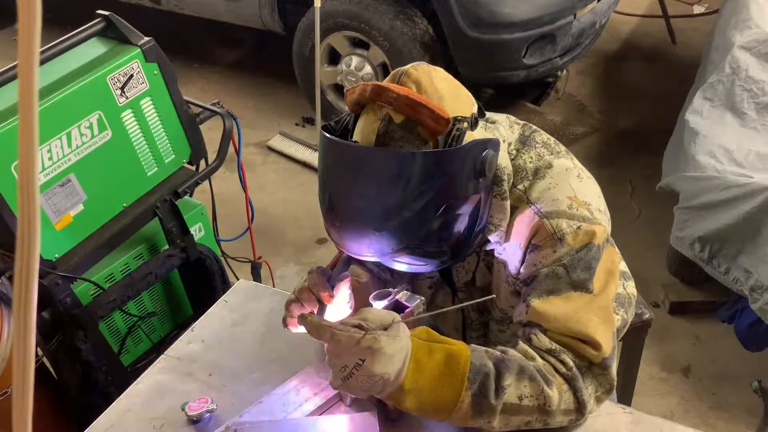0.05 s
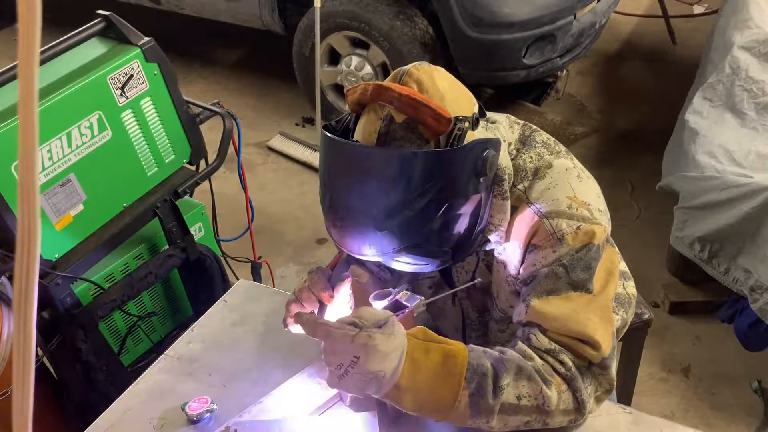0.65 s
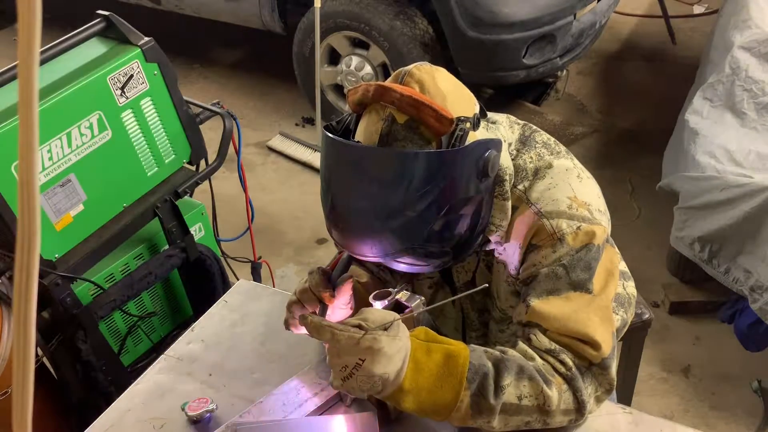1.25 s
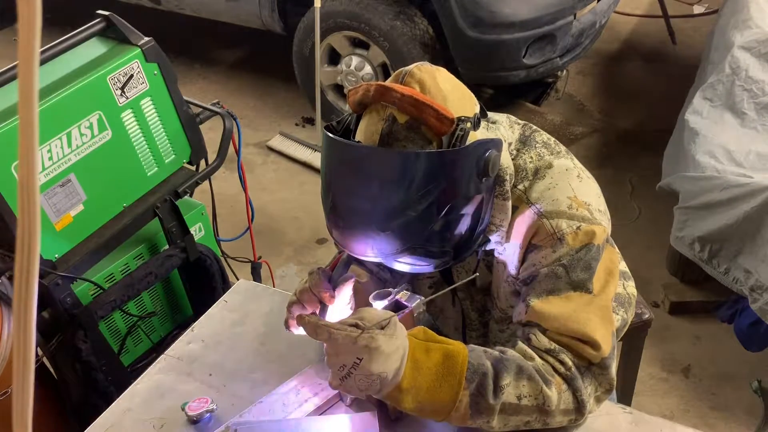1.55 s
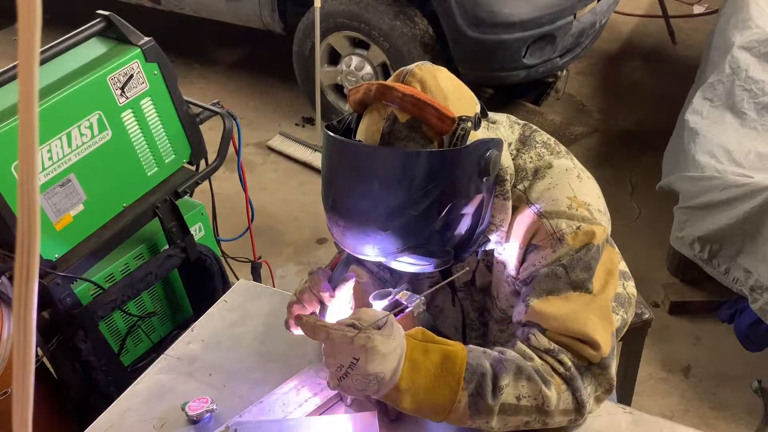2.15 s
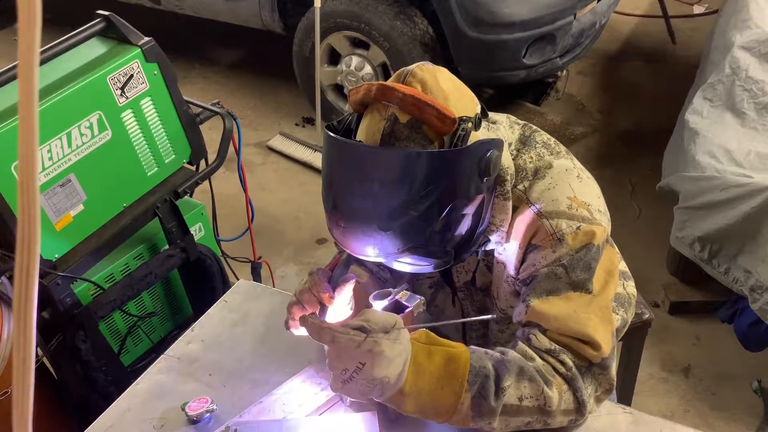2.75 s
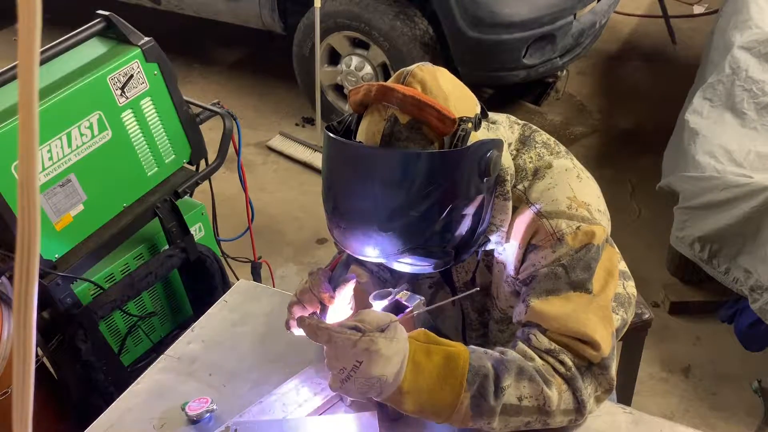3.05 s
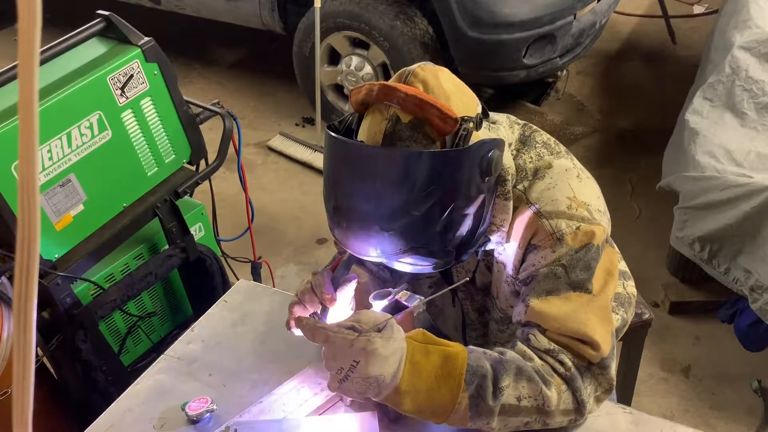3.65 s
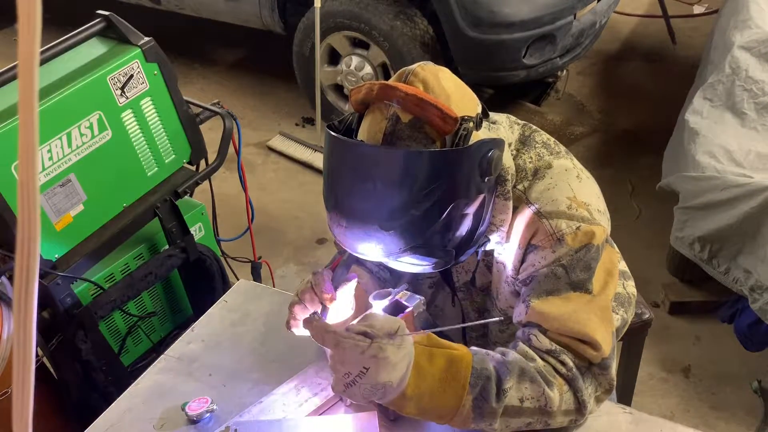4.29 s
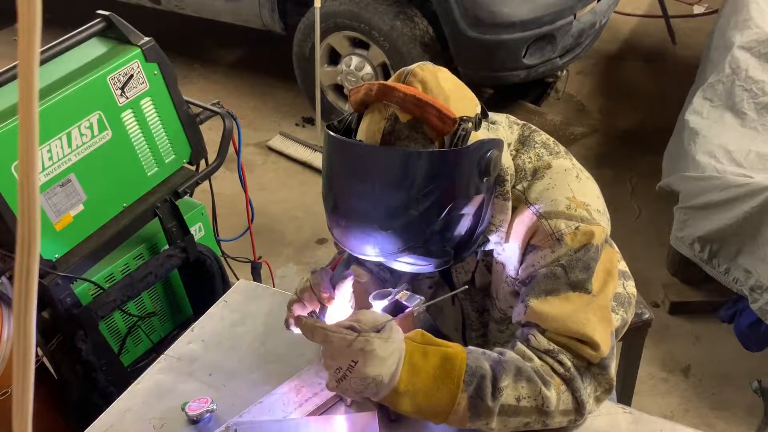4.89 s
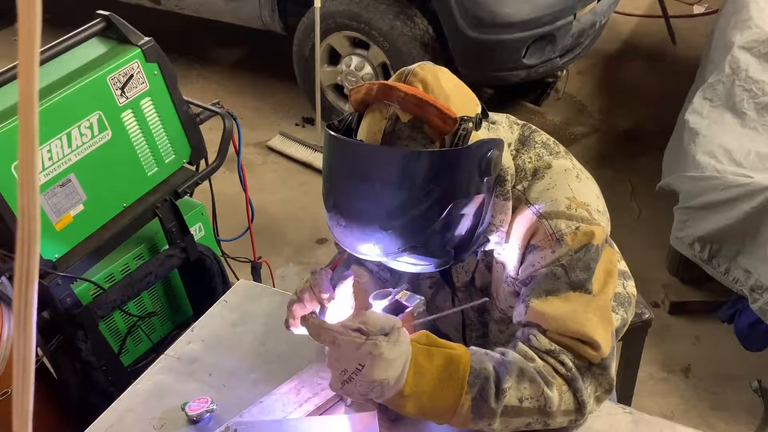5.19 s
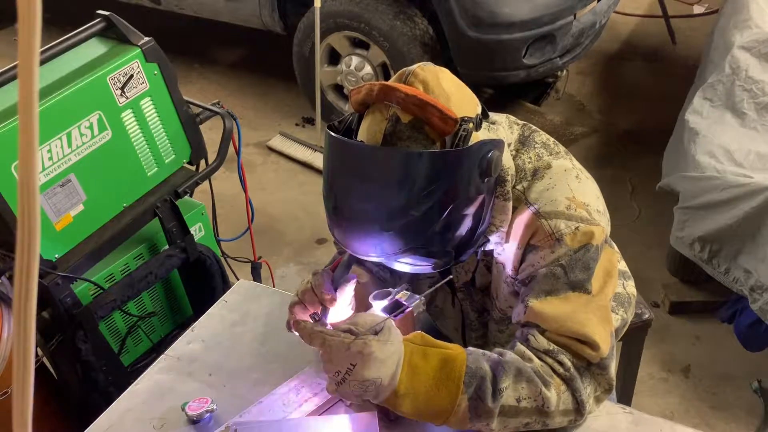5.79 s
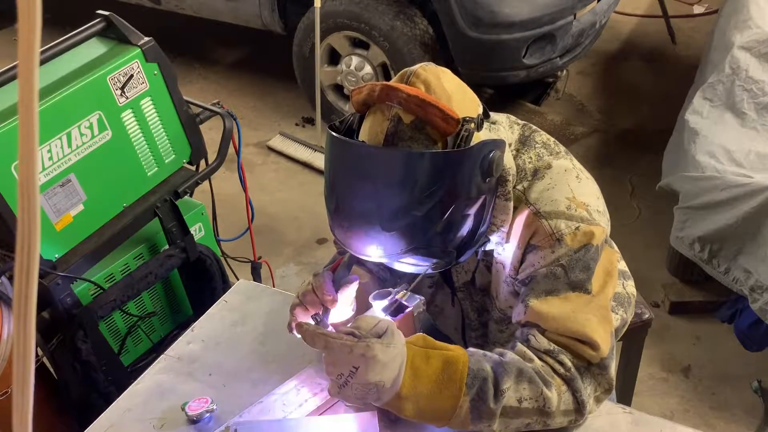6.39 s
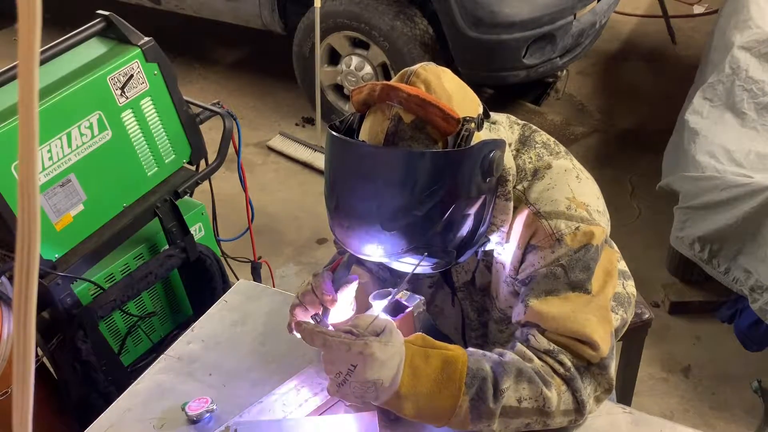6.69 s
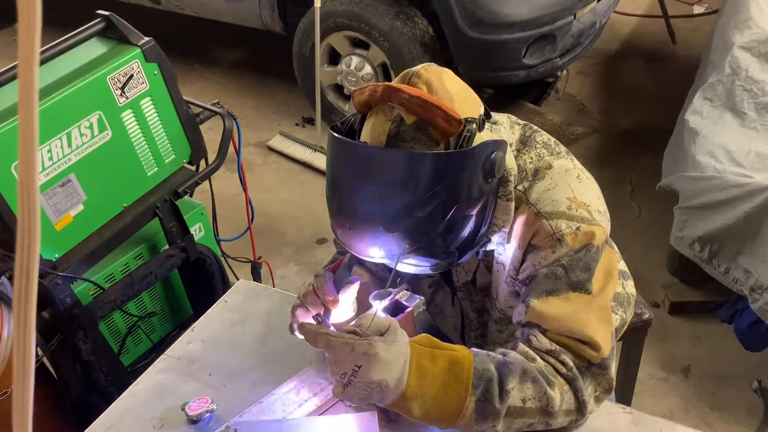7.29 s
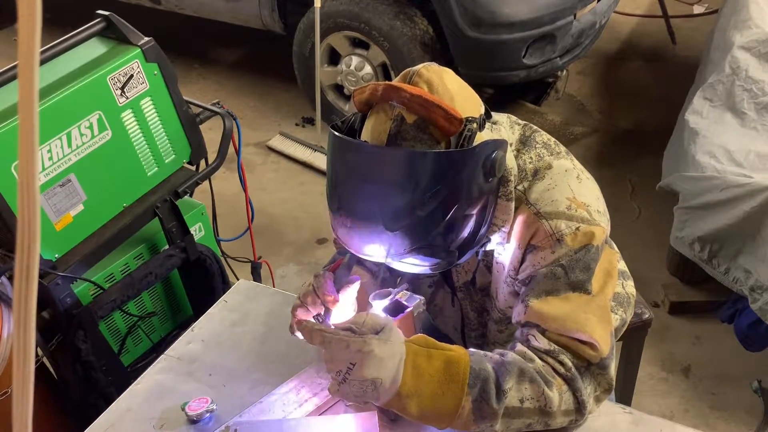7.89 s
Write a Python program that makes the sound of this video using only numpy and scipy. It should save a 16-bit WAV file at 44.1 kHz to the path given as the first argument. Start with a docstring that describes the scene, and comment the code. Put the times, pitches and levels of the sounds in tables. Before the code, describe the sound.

An electric welding arc buzzes on aluminum throughout, close by in a workshop with little echo. The buzz is bright and fizzy, holding one pitch while its loudness wavers. It opens with a brief rasp and a few sharp spits, dips, then swells at about 0.5 seconds. From 1 to 1.5 seconds it hardens into a harsh rasp, then returns to a softer buzz with occasional crackles. Strong, sputtering rasps come again from 3 to 3.5 and from 4.5 to 4.9 seconds. The buzz drops briefly just after 5 seconds, and shorter rasps follow around 5.4, 6.2 and 7.2 seconds. Between them the softer buzz keeps swelling and thinning, continuing to the end at about 8 seconds. Underneath, shielding gas hisses steadily from the torch, and the welding machine's cooling fan holds a mid-pitched whine with a light rush of air.

```python
"""An AC TIG arc buzzes on a small aluminium tank in a workshop. The current reverses twice a cycle, and
each reversal radiates a pressure pulse that excites the resonances of cup, tank and helmet. The soft
buzz swells as the welder lengthens the arc and dips when the filler rod chokes it; whenever the arc
goes out at a reversal and must restrike, it turns to a hard rasp. Behind it, shield gas hisses from
the cup and the welder's cooling fan whines at its blade-passing frequency."""
import sys
import numpy as np
from scipy import signal
from scipy.fft import rfft, irfft, next_fast_len
from scipy.io import wavfile

SR = 44100
rng = np.random.default_rng(int(sys.argv[2]) if len(sys.argv) > 2 else 0)


def pcm_store(signal):
    """Save signal as 16-bit PCM."""
    levels = np.round(np.clip(np.atleast_2d(signal), -1, 1) * 32767)
    wavfile.write(sys.argv[1], SR, levels.astype(np.int16).T)


N = 350154
T = np.arange(N) / SR
AC_HZ = 258.07
# where the current reverses, as shares of a cycle: first, second
REVERSAL_SHARES = [.505, .775]
# stretches of restriking, levels relative: start_s, end_s, snap_db, body_db, top_db
RESTRIKE_SPANS = [(0, .135, -38, -9, -1), (0.957, 1.04, -32, -4, 2), (1.04, 1.528, -35, -6.5, 1.5),
                  (3.039, 3.486, -33, 1.5, 4.5), (4.458, 4.882, -30.5, -2, 1), (5.31, 5.45, -40, 1.5, -5),
                  (6.081, 6.279, -35.5, 0, -2), (7.091, 7.204, -31.5, -5, -2),
                  (7.206, 7.336, -35.5, -.5, -3)]


def arc(length, choke_db, gain_db=21.0, body_hz=4500, top_hz=11300, sizzle_s=0.006, glove_db=-14):
    """Impulse excitation: snaps, their sizzle and their echo off the glove drive fixed resonances."""
    # modes of cup, tank and helmet gap: centre_hz, width_hz, first_db, second_db, restrike_db
    modes = [(822, 160, 3.5, 0, 3), (1325, 335, 1.5, 3.5, 4.5), (2193, 404, -5, -1, 4.5),
             (2628, 410, -3, 8, 5), (3050, 320, -7.5, -9.5, 3.5), (3670, 335, 2, 3.5, 2.5),
             (4436, 610, 0, 1.5, 3.5), (6430, 2200, 0.5, 7, 4.5), (7630, 460, -2.5, -4, 3),
             (8280, 620, 4.5, 3.5, 4), (9080, 660, -1, 9.5, 1), (10540, 1390, 2.5, 4, 4),
             (11620, 350, 1, 8, 3.5), (12160, 570, 5, 2, -5), (13500, 1400, 9, 16, 6),
             (15200, 470, 15.5, -1, 5.5)]
    # narrow antiresonances: centre_hz, width_hz, depth_db
    hollows = [(1850, 90, -4), (5000, 250, -8), (8000, 100, -5), (9800, 140, -4), (14850, 200, -4)]
    # broad colour of every snap: frequency_hz, gain_db
    bite = [(750, -1), (1400, 2.5), (2000, 0), (3200, -.5), (6200, -.5), (7300, 1.5), (10800, 3),
            (12500, 0)]
    # sizzle trailing each kind of snap, relative to it: first_db, second_db, restrike_db
    sizzles_db = [-36, -39, -54]
    energy_decay = np.exp(-1 / (sizzle_s * SR))
    echo_s = (0.396 + 0.031 * wander(1.5)) / 1000  # the glove moves
    centres, widths, *modes_db = np.transpose(modes)
    trains = (*reversals(length, choke_db), restrikes())
    polarities = (-1, 1, 1)  # the two reversals push the air in opposite senses
    out = 0
    for train, sign, mode_db, sizzle_db in zip(trains, polarities, modes_db, sizzles_db):
        times, db, body_db, top_db = train
        hz, path = scattering()
        body = 1 / (1 + (hz / body_hz) ** 6)
        top = 1 / (1 + (top_hz / (hz + 1)) ** 20)
        hollow_db = sum(depth * np.exp(-((hz - f) / width) ** 2) for f, width, depth in hollows)
        gain = resonances(hz, zip(centres, widths, mode_db)) * amp(hollow_db + log_interp(bite, hz))
        colour = path * minimum_phase(gain)
        hiss = amp(sizzle_db) * rng.standard_normal(N)
        for band, band_db in ((body, body_db), (1 - body - top, 0), (top, top_db)):
            sizes = sign * amp(db + band_db + gain_db)
            echoes = clicks(times + np.interp(times, T, echo_s), amp(glove_db) * sizes)
            snaps = clicks(times, sizes) + echoes
            sizzle = np.sqrt(signal.lfilter([1], [1, -energy_decay], snaps ** 2 + 1e-20)) * hiss
            response = np.roll(irfft(colour * band), 256, axis=1)
            out += signal.oaconvolve((snaps + sizzle)[None], response, axes=1)[:, 256:256 + N]
    return out


def reversals(length, choke_db, roam_hz=7, pop_share=0.12, pop_db=2.5, crackle_db=3.5):
    """Periodic pulses make a buzz: a fizz of blasted oxide, then a tick unless the arc restrikes."""
    # top treble of the soft snaps: time_s, gain_db
    treble = [(.3, 4), (.66, -0.5), (.73, -2), (.95, -0.5), (2.5, 1.5), (3.3, -4), (4.2, 1), (4.95, -4.5),
              (5.45, 0), (5.56, -8), (5.8, 0), (6.25, 0), (6.4, -11), (6.8, -6), (6.9, 1), (7.3, -1),
              (7.4, -3), (7.94, -5)]
    cycles = np.arange(int(N / SR * AC_HZ)) / AC_HZ
    first, second = (cycles + share / AC_HZ for share in REVERSAL_SHARES)
    length, choke_db = np.interp(cycles, T, length), np.interp(cycles, T, choke_db)
    hard = np.interp(second, T, restriking()) > 0.9
    roam, slip, sway, clump = (np.interp(cycles, T, wander(hz)) for hz in (roam_hz, roam_hz, 19, 19))
    _, jitter, crackle = rng.standard_normal((3, 2, len(cycles)))
    popping = rng.random(jitter.shape) < pop_share  # oxide pops at random
    pops = popping * np.minimum(rng.exponential(1, jitter.shape), 2) * np.clip(1 - length, 0, 1)
    # the arc root roams; the gap between the snaps slips with arc length, shifting the timbre
    slip_us = np.outer([1, 0], 25 * (slip + 1 - length))
    late_us = np.where(hard, 0.15, 1) * (9 * roam + slip_us + (2.5 + length) * jitter)
    times = np.array([first, second]) + late_us / 1e6
    first_db = np.where(hard, -40.5, by_length(-46.5, -34, length) + choke_db)
    second_db = by_length(-55, -42.5, length) + choke_db
    db = np.array([first_db, second_db]) + 1.12 * sway + pop_db * pops
    sputter_db = ~hard * crackle_db * np.tanh(crackle) * (1 - np.tanh(clump))
    body_db = np.array([by_length(2, 0, length), by_length(-4, 3.5, length)]) + sputter_db
    top_db = np.interp(times, *np.transpose(treble))
    firsts, seconds = np.stack([times, db, body_db, top_db], axis=1)
    return firsts, seconds[:, ~hard]


def restrikes(drift_us=4, jitter_us=1.3, falter_us=45, sway_db=0.7, rough_db=0.74):
    """Electrical breakdown: the arc reignites with one hard crack a cycle, or spits a lone one."""
    # faltering cracks, late and mostly weaker: time_s, change_db
    falters = [(3.054, -14), (3.058, -15), (3.066, 2), (3.109, -6), (3.12, -7), (3.163, -3), (3.19, -3),
               (3.202, -6), (3.237, -2), (3.283, -4), (3.318, -5), (3.376, -6), (3.454, -9), (3.469, -15),
               (3.481, -9), (4.529, -5), (4.638, -2), (4.684, 3.5), (4.727, -10), (5.32, 7), (5.343, -6),
               (5.363, -7), (5.41, -11), (5.437, -7), (6.096, 3), (6.262, -8)]
    # lone cracks, levels relative: time_s, snap_db, body_db
    spits = [(.181, -38, 1), (.1864, -37, 3), (.192, -36, -3), (.205, -43, -3), (0.248, -34.5, 3),
             (0.2524, -34, -3), (0.2666, -35, 1), (0.3403, -32, -3), (.349, -32.5, 0), (.678, -32, -15),
             (0.9368, -33, -2), (.949, -34, 5.5), (1.551, -42, 9), (1.591, -37, -2), (1.602, -37, -4),
             (2.0626, -33, -2), (2.095, -31, -7), (2.099, -34, -3), (2.8124, -32.5, 1), (2.823, -33, -3),
             (3.0147, -34, 0), (3.4885, -38, 1), (3.5, -44, 3), (4.888, -40, 6), (4.901, -42, 6),
             (5.475, -42, 10)]
    times = (np.arange(int(N / SR * AC_HZ)) + REVERSAL_SHARES[1]) / AC_HZ
    hard, levels = np.zeros(len(times), bool), np.zeros((len(times), 3))
    for start, end, *row in RESTRIKE_SPANS:
        inside = (times > start) & (times < end)
        hard[inside], levels[inside] = True, row
    drift, sway = (np.interp(times, T, wander(10)) for _ in range(2))
    rough, jitter, crackle_db = rng.standard_normal((3, len(times)))
    db, body_db, top_db = levels.T
    db = db + rough_db * rough + sway_db * sway
    late_us = drift_us * drift + jitter_us * jitter
    for time_s, change_db in falters:
        at = np.argmin(abs(times - time_s))
        db[at] += change_db
        late_us[at] += falter_us * (1 + abs(jitter[at]))
    cracks = np.array([times + late_us / 1e6, db, body_db + crackle_db, top_db])
    return np.hstack([cracks[:, hard], np.transpose([(*row, 0) for row in spits])])


def resonances(hz, modes, cutoff_hz=660):
    """Overlapping modes add in power; a source much smaller than the wavelength radiates little."""
    power = sum(amp(db) ** 2 / (1 + (2 * (hz - f) / width) ** 2) ** 2 for f, width, db in modes)
    return np.sqrt(power / (1 + (cutoff_hz / (hz + 1)) ** 12))


def scattering(scatter_ms=1.0, scatter_db=4, apart_db=-11, room_db=-12, size=16384):
    """Multipath: a snap arrives directly, scatters off tank and helmet, then reverberates."""
    # workshop reverberation: frequency_hz, t60_s
    decay = [(500, 0.071), (4000, 0.19), (15000, 0.11)]
    # level difference between channels: frequency_hz, left_minus_right_db
    balance = [(2000, 4.5), (5000, -3), (6500, 2), (9500, -5.5), (12000, 0)]
    # phase difference between channels: frequency_hz, left_lead_rad
    bearing = [(600, 0.45), (1200, 2.03), (2500, 1.26), (5000, 1.14), (8000, 1.9), (13000, 2.46)]
    ms, hz = 1000 * np.arange(size) / SR, np.fft.rfftfreq(size, 1 / SR)
    bursts = rng.standard_normal((3, size)) * np.exp(-np.square(ms / scatter_ms))
    bursts = rfft(bursts / np.linalg.norm(bursts, axis=1, keepdims=True))
    near = (1 + amp(scatter_db) * bursts[2]) * (1 + amp(apart_db) * bursts[:2])
    near /= np.sqrt(abs(near) ** 2 + 0.18)  # smears the snap but keeps its colour
    f, t, noise = signal.stft(rng.standard_normal((2, size)), SR, nperseg=256)
    fading = noise * amp(-60 * t / log_interp(decay, f)[:, None])
    tail = signal.istft(fading, SR, nperseg=256)[1][:, :size]
    tail = rfft(tail / np.linalg.norm(tail, axis=1, keepdims=True))
    lead = np.outer([0.5, -0.5], log_interp(bearing, hz))
    return hz, (near + amp(room_db) * tail) * pan(log_interp(balance, hz)) * np.exp(1j * lead)


def torch(draw_s=0.1, close_s=0.057, tremor=0.23, dip_edge_s=0.0058):
    """Amplitude modulation by hand: the unsteady arc length, and the choking by the rod in dB."""
    # the torch is drawn back, 0 for a short arc and 1 for a long one: start_s, end_s, length
    draws = [(.17, .33, 0.1), (.5, .635, 1), (.97, 1.01, 0.62), (1.47, 1.51, 0.56), (1.56, 1.72, 0),
             (2.03, 2.13, 0.3), (2.23, 2.51, 0.75), (2.55, 2.61, 0.43), (2.78, 2.85, 0.25),
             (3.07, 3.46, 0.97), (3.92, 4.02, 0.59), (4.18, 4.26, 0.46), (4.28, 4.41, 0.73),
             (4.49, 4.66, 1), (4.7, 4.85, 0.83), (5.09, 5.27, 0.71), (5.36, 5.44, 0.55), (5.72, 5.8, 0.23),
             (5.97, 6.03, 0.82), (6.12, 6.25, 0.66), (6.59, 6.62, 0.1), (6.88, 7.05, 0.7),
             (7.12, 7.14, 0.6), (7.29, 7.31, 0.97), (7.53, 7.58, 0.52), (7.65, 7.735, 0.88)]
    # the filler rod enters the pool: start_s, end_s, change_db
    dips = [(0.353, 0.385, -6), (3.514, 3.68, -0.5), (4.928, 5.067, -2.5), (5.13, 5.178, -12),
            (5.453, 5.63, -3), (6.29, 6.54, -1.5), (7.337, 7.364, -2.5), (7.735, 7.767, -3.5)]
    length = held(draws, draw_s, close_s) + tremor * np.tanh(wander(52))
    choke_db = -held([(start, end, -db) for start, end, db in dips], dip_edge_s, dip_edge_s)
    return length, choke_db


def restriking(edge_s=0.007):
    """A gate: 1 while the arc restrikes, 0 while it burns softly."""
    return held([(start, end, 1) for start, end, *_ in RESTRIKE_SPANS], edge_s, edge_s)


def hum(length, choke_db, restrike_db=-4):
    """Thermal expansion: the arc column heats twice a cycle; unequal halves add the fundamental."""
    fundamental_db = by_length(-63, -50.5, length) + choke_db + restrike_db * restriking()
    octave_db = by_length(-56, -41.5, length) + choke_db
    phase = 2 * np.pi * AC_HZ * T + 0.015 * wander(24)
    octave = amp(octave_db) * stereo_sine(2 * phase, lead_rad=0.56) * pan(side_db=2)
    return np.sqrt(2) * (octave + amp(fundamental_db) * np.sin(phase))


def whine(length, choke_db, long_arc_db=-6, restrike_db=-8, waver_db=3.0):
    """Upper harmonics of the current sing out while the arc is short, each wavering on its own."""
    # partials of the short arc: harmonic, level_db
    partials = [(8, -66.5), (9, -66), (12, -56.5), (15, -62.5), (16, -61.5), (18, -60), (22, -59.5),
                (23, -58.5), (24, -57.5), (27, -65), (28, -62.5), (32, -61.5), (35, -78), (54, -68),
                (59, -61)]
    phase, rasp = 2 * np.pi * (AC_HZ * T - REVERSAL_SHARES[0]), restriking()
    arc_db = choke_db + rasp * restrike_db + (1 - rasp) * long_arc_db * length
    tones = sum(amp(db + waver_db * wander(5)) * stereo_sine(round(k) * phase, lead_rad=1)
                for k, db in partials)
    return np.sqrt(2) * amp(arc_db) * tones


def growl(length, short_arc_db=-9):
    """Low harmonics of the current fill out the rasp, most when a long arc restrikes."""
    # partials of a long restriking arc: harmonic, level_db
    partials = [(3, -56.5), (4, -59), (5, -55), (6, -55)]
    phase = 2 * np.pi * (AC_HZ * T - REVERSAL_SHARES[1])
    tones = sum(amp(db) * np.sin(round(k) * phase + 2 * np.pi * rng.random()) for k, db in partials)
    return np.sqrt(2) * restriking() * amp(short_arc_db * (1 - length)) * tones


def gas(level_db=-50.5, restrike_db=-3):
    """Jet noise: argon hisses from the torch cup, a little weaker while the arc restrikes."""
    # relative spectrum of the jet: frequency_hz, density_db
    jet = [(600, -24), (1500, -2.5), (3000, 10), (5100, 5), (6200, 9.5), (9000, 3), (12000, 0), (15500, -7)]
    flicker_db = 0.5 * wander(20)
    return flow_noise(jet) * amp(level_db + flicker_db + restrike_db * restriking())


def fan(blade_hz=578.3, blade_db=-40, flutter=0.17, rush_db=-46.5, mains_hz=120, mains_db=-78):
    """Blade passage gives harmonics that flutter in the draught, over rushing air and mains hum."""
    # partials of the blade tone: harmonic, relative_db, left_lead_rad
    partials = [(1, -0.54, 0.81), (2, -21, 0.83), (3, -30.5, 1.7), (6, -16, 2.42)]
    # relative spectrum of air rushing through the welder's case: frequency_hz, density_db
    draught = [(25, -73), (62, -45), (105, -19.5), (165, -23), (215, -15.5), (310, -8), (400, -1.5),
               (490, 1), (620, -7.5), (740, -13), (1000, -12.5), (2600, -13), (5000, -20.5), (15000, -27)]
    hz = blade_hz + 0.797 * wander(1.5)
    db = blade_db + 0.52 * wander(7.4)
    phase = 2 * np.pi * np.cumsum(hz) / SR + 0.029 * wander(23)
    blades = sum(amp(db + gain_db) * (1 + flutter * wander(23.6)) * stereo_sine(round(k) * phase, lead)
                 for k, gain_db, lead in partials)
    mains = amp(mains_db) * np.sin(2 * np.pi * mains_hz * T)
    rush = flow_noise(draught) * amp(rush_db + 1.54 * wander(33))
    return np.sqrt(2) * (blades * pan(side_db=2.5) + mains) + rush


def flow_noise(spectrum):
    """Partial coherence: two channels of coloured noise, alike at long wavelengths."""
    # likeness of the channels: frequency_hz, correlation
    likeness = [(130, 0.93), (290, 0.9), (640, 0.63), (1400, 0.053), (7000, -0.48), (15000, -0.19)]
    hz = np.fft.rfftfreq(N, 1 / SR)
    left, other = rfft(rng.standard_normal((2, N)))
    correlation = log_interp(likeness, hz)
    right = correlation * left + np.sqrt(1 - correlation ** 2) * other
    return unit(irfft(np.array([left, right]) * amp(log_interp(spectrum, hz)), N))


def minimum_phase(gain):
    """Causality: gives a gain curve the phase of a resonator, which rings only after it is struck."""
    log_gain = np.log(np.maximum(gain, 1e-4))
    mirrored = np.concatenate([log_gain, log_gain[-2:0:-1]])
    return np.exp(np.conj(signal.hilbert(mirrored)))[:len(gain)]


def clicks(times, sizes, reach=8):
    """Band-limited impulses, each a windowed sinc at its exact time."""
    at = np.floor(times * SR).astype(int)[:, None] + np.arange(-reach, reach + 1)
    offset = at - times[:, None] * SR
    shape = np.sinc(offset) * np.cos(np.pi * offset / (2 * reach + 2)) ** 2
    inside = (at >= 0) & (at < N)
    return np.bincount(at[inside], (sizes[:, None] * shape)[inside], N)


def wander(rate_hz, step=32):
    """Low-pass noise of rms 1, up to about rate_hz."""
    count = next_fast_len(N // step + 2)
    hz = np.fft.rfftfreq(count, step / SR)
    slow = irfft(rfft(rng.standard_normal(count)) / (1 + (hz / rate_hz) ** 2), count)
    return np.interp(np.arange(N), step * np.arange(count), unit(slow))


def held(rows, rise_s, fall_s):
    """Trapezoidal envelopes; the highest one counts."""
    return np.max([np.interp(T, [start - rise_s, start, end, end + fall_s], [0, height, height, 0])
                   for start, end, height in rows], axis=0)


def by_length(short_db, long_db, length):
    """A level between its short-arc and long-arc values."""
    return short_db + (long_db - short_db) * length


def log_interp(points, hz):
    """Interpolates on a log-frequency axis."""
    f, value = np.transpose(points)
    return np.interp(np.log(hz + 1), np.log(f), value)


def stereo_sine(phase, lead_rad):
    """A tone whose left channel leads in phase."""
    return np.sin(phase + np.array([[lead_rad], [0]]))


def pan(side_db):
    """Channel gains, the left side_db above the right."""
    return amp(np.outer([0.5, -0.5], side_db))


def amp(db):
    """Decibels to gain."""
    return 10 ** (np.asarray(db) / 20)


def unit(x):
    """Scales to rms 1."""
    return x / np.sqrt(np.mean(x ** 2) + 1e-20)


def scene():
    """Superposition of the arc's snaps and tones, the gas and the fan."""
    length, choke_db = torch()
    buzz = arc(length, choke_db) + hum(length, choke_db) + whine(length, choke_db)
    return buzz + gas() + fan() + growl(length)


def record(dry, cutoff_hz=15850):
    """A steep low-pass filter removes the highest treble."""
    lowpass = signal.firwin(1001, cutoff_hz, window=("kaiser", 9), fs=SR)
    return signal.oaconvolve(dry, lowpass[None], "same")


dry = scene()
out = record(dry)
pcm_store(out)
```